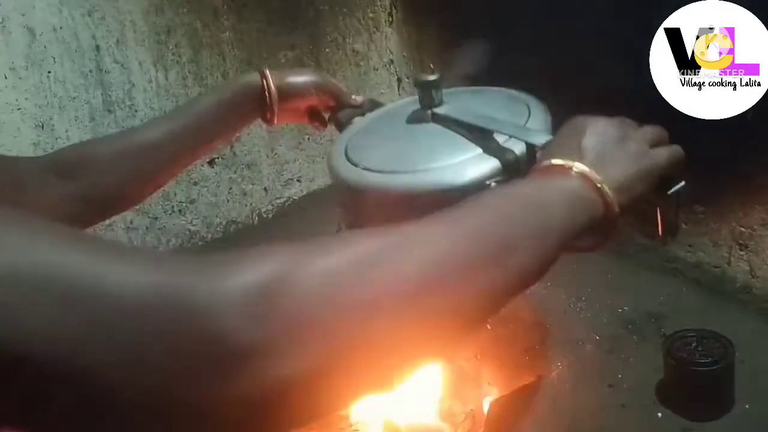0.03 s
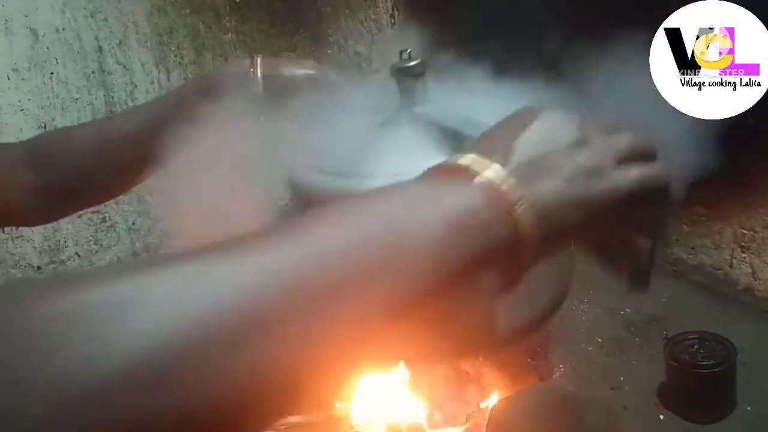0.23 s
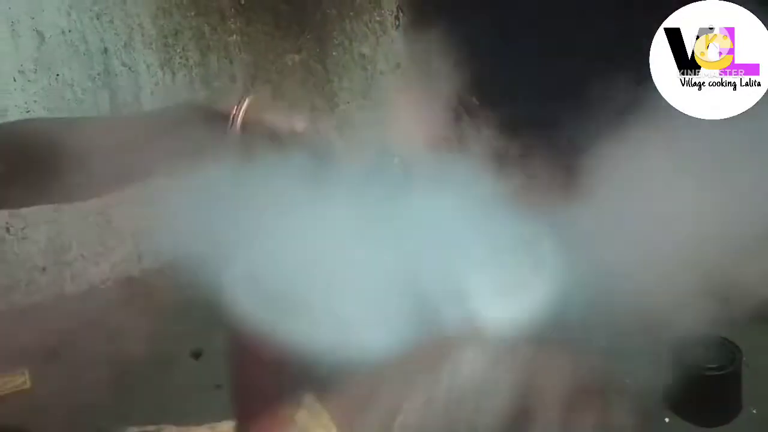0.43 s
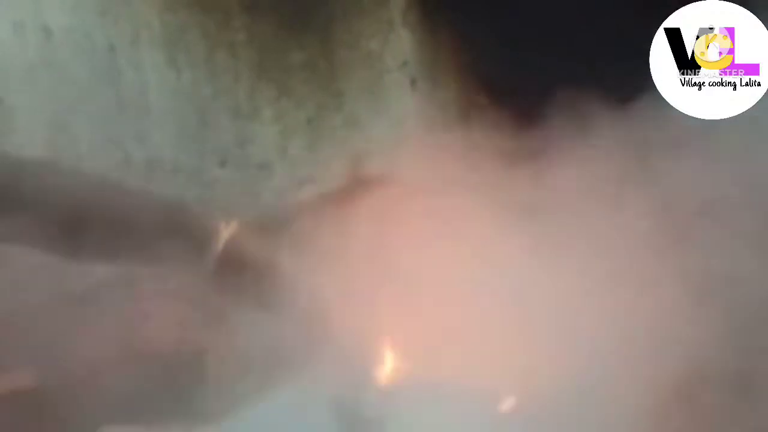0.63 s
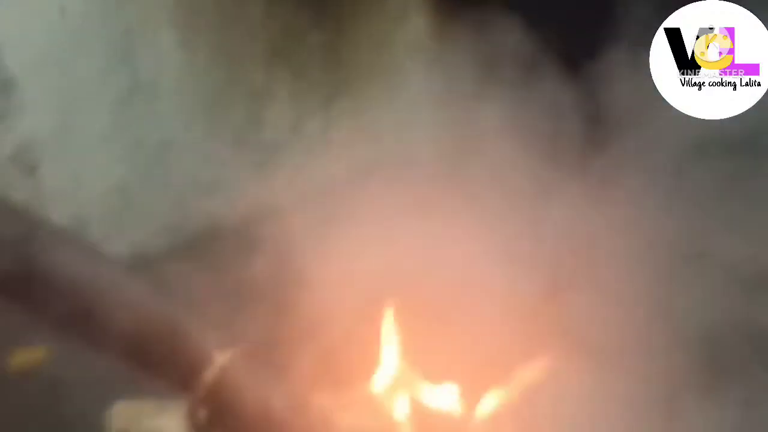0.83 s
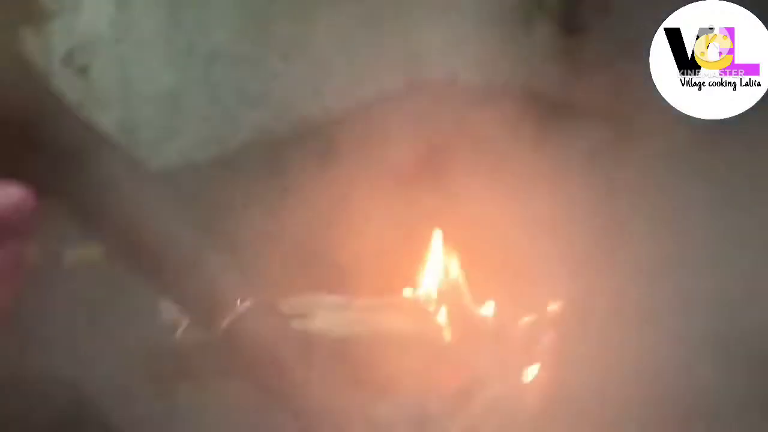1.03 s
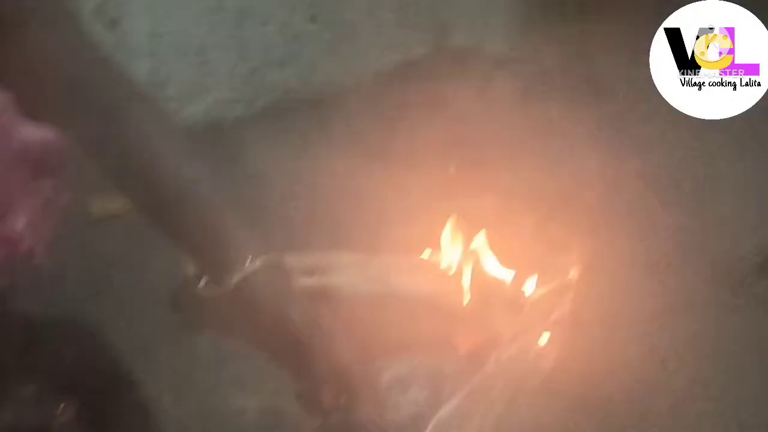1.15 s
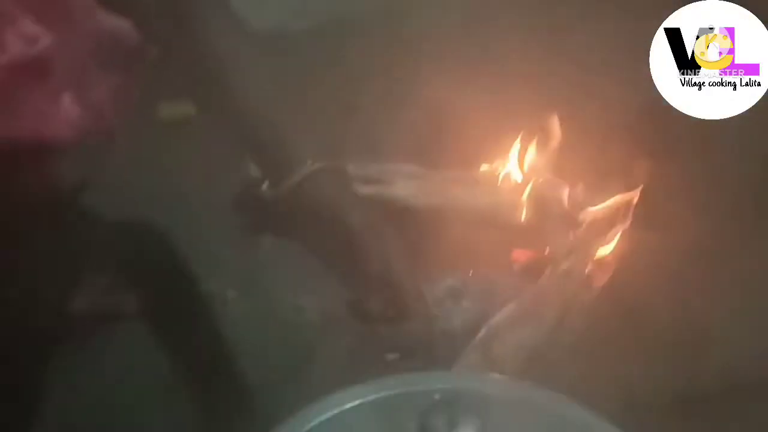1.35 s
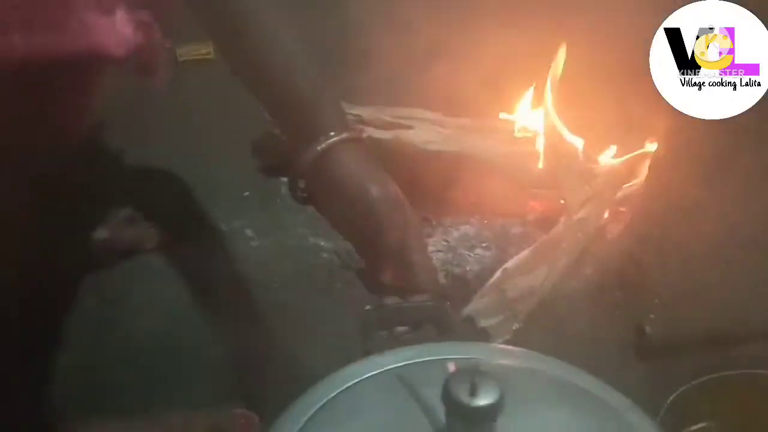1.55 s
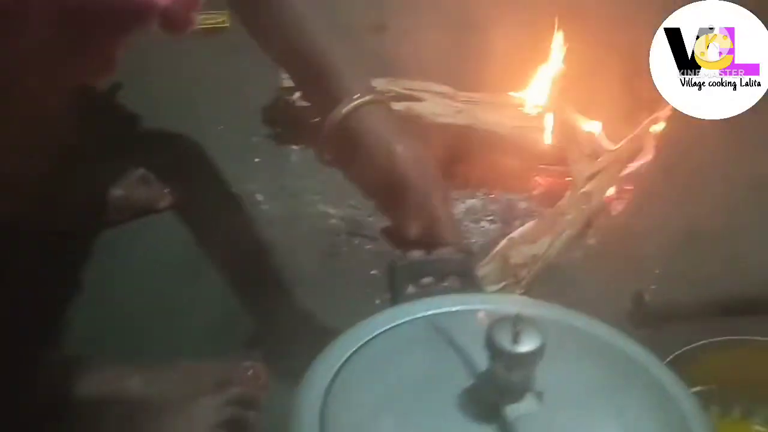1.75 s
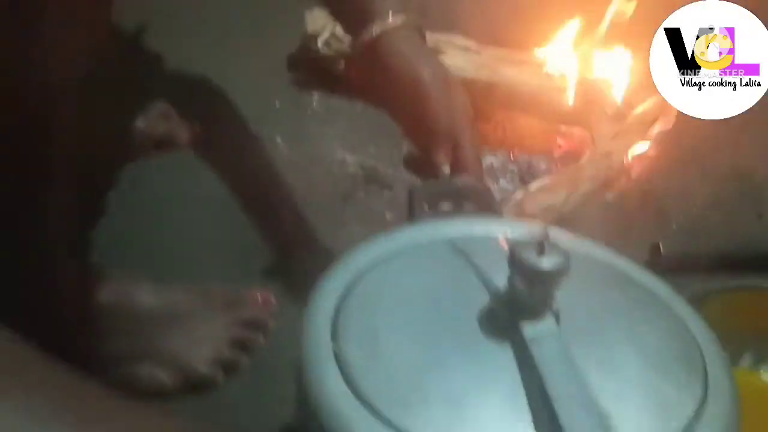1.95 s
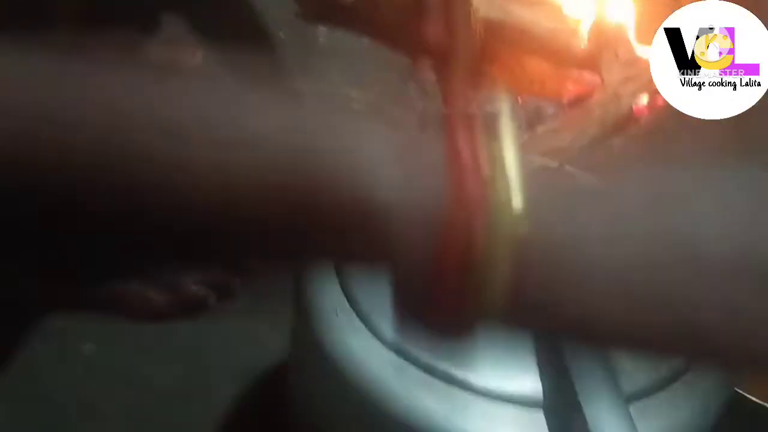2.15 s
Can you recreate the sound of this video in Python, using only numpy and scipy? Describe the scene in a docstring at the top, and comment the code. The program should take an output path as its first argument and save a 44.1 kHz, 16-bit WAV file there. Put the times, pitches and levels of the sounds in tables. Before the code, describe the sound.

A pressure cooker blasts steam, then is set down with faint knocks and scrapes.

```python
"""An earth floor by a wood fire at night, one microphone feeding both channels. Close up, a pressure
cooker is lifted off the fire and blows a loud, turbulent jet of steam with a fuzzy half-whistle from
its vent; gusts of it pop on the microphone. The pot is set down, knocks, scrapes over the gritty earth
and rings faintly. Behind it, insects hiss in a high band."""
import sys
import numpy as np
from scipy import signal
from scipy.fft import rfft, irfft, next_fast_len
from scipy.io import wavfile
from scipy.ndimage import uniform_filter1d, map_coordinates

SR = 44100
rng = np.random.default_rng(int(sys.argv[2]) if len(sys.argv) > 2 else 0)


def unload_wav(signal):
    """Save mono or channel-first audio to the path in sys.argv[1] as 16-bit WAV at rate SR, clipped to [-1, 1]."""
    wavfile.write(
        sys.argv[1],
        SR,
        np.round(np.clip(np.atleast_2d(signal).T, -1, 1) * 32767).astype(np.int16),
    )


N = 97020  # 2.2 s

# The blast of steam, close up: time_s, jet_db, rumble_over_jet_db, mid_hiss_over_jet_db
BLAST = [(.06, -75, -27, -9), (.095, -71, -20, -12), (.16, -50, -31, -9.5), (.2, -31, -31.5, -12),
         (.24, -28, -26, -7.5), (.26, -23, -28, -12.5), (.315, -18, -22.5, -15.5), (.45, -18, -24, -13.5),
         (.6, -17.5, -24.5, -13.5), (.76, -18.5, -22, -12), (.845, -21.5, -25.5, -12.5),
         (.89, -36.5, -27.5, -11.5), (.93, -44, -22, -7.5), (.957, -54, -21, -3), (.975, -77, -22, -8),
         (.99, -100, -10.5, -5)]
# Lift or dip of the jet's top treble: time_s, gain_db
JET_TOP = [(.06, -5), (.2, 1), (.27, -1.5), (.34, -1.5), (.6, -1.5), (.8, 2), (.87, 3.5), (.93, -6.5),
           (.99, -7)]
# The vent's half-whistle: time_s, pitch_hz, level_over_mid_hiss_db
VENT_WHISTLE = [(0, 3566, -16), (.27, 3539, -18), (.33, 3550, -0.5), (.42, 3620, -15), (.55, 3775, -2.5),
                (.7, 3783, -6.5), (.8, 3980, -19.5), (1, 3950, -23.5)]
# Tone of the bright jet, its mid hiss and its rumble: frequency_hz, relative_db
JET_SPECTRUM = [(2940, -41.5), (5000, -10), (5810, -6.5), (6600, -1.5), (7200, 1), (10500, -13.5),
                (13300, -3), (14800, -1), (15600, -5.5), (16000, -16)]
MID_SPECTRUM = [(760, -35), (1300, -12.5), (2030, -10.5), (2390, -9.5), (2500, -7), (3450, -2.5), (3860, 0),
                (5000, -6.5), (6500, -27), (11000, -120)]
RUMBLE_SPECTRUM = [(18, -40.5), (30, -13.5), (59, -11), (187, -2.5), (335, -3), (497, -4.5), (610, -4),
                   (1300, -13), (1690, -32), (2860, -120)]


def steam_jet(whistle_width_hz=300, top_from_hz=10500):
    """Turbulent steam leaves the vent: rumble, hiss and a fuzzy whistle all flutter together."""
    jet_db, rumble_db, mid_db = curves(BLAST)
    top_db, = curves(JET_TOP)
    vent_hz, vent_db = curves(VENT_WHISTLE)
    flutter = amp(jet_db + 0.33 * wobble(21) + 0.31 * wobble(300))
    rumble = amp(rumble_db + 1.8 * wobble(60)) * rush(RUMBLE_SPECTRUM, patchy_db=0)
    vent_tone = np.sin(2 * np.pi * np.cumsum(vent_hz) / SR)
    whistle = unit(wobble(whistle_width_hz) * vent_tone)  # the tone smears into a narrow band
    mid_hiss = amp(mid_db) * (rush(MID_SPECTRUM, patchy_db=1.5) + amp(vent_db) * whistle)
    jet = rush(JET_SPECTRUM, patchy_db=1)
    top = filtered(jet, lambda hz: 1 / (1 + (top_from_hz / (hz + 1)) ** 20))
    return flutter * (jet + (amp(top_db) - 1) * top + mid_hiss + rumble)


# Gusts of steam right on the microphone: start_s, peak_db, direction (+1 push, -1 pull)
GUSTS = [(0.4437, -17, 1), (0.557, -11.5, 1), (0.5656, -16.5, -1), (0.587, -11.5, 1), (0.5949, -10, -1),
         (.698, -31.5, 1)]


def microphone_pops(rise_s=0.00019, fall_s=0.0014):
    """Each gust is one short pressure pulse that swings back through a bass cut."""
    t = np.arange(SR // 20) / SR
    push = (1 - np.exp(-t / rise_s)) ** 2 * np.exp(-t / fall_s)
    pulse = bass_cut(push, corner_hz=71)
    out = np.zeros(N)
    for start_s, peak_db, direction in GUSTS:
        out[round(start_s * SR):][:len(t)] += np.sign(direction) * amp(peak_db) * pulse / pulse.max()
    return out


# Ringing modes of the pot: pitch_hz, relative_db, t60_s
POT_MODES = [(292.2, 3.5, .5), (523, -3.5, 0.19), (519, -29.5, 4.7), (629, 5, 0.13), (1010, -2, 0.19),
             (1050, -9, 0.47), (1180, -0.5, 0.27), (1610, 4, 0.15), (1700, 1, 0.11), (2930, -10, 0.61),
             (3270, -9.5, 0.51), (3608, -23, 0.5), (3930, -12.5, 0.51), (7000, -8, .4)]
# The pot meets the floor: start_s, level_db, centre_hz, width_octaves, rattle_t60_s, ring_gain_db
POT_KNOCKS = [(0.906, -43.5, 1100, 0.71, 0.12, -40), (1.04, -43.5, 652, 0.34, 0.14, -0.5),
              (1.045, -44, 3200, .5, 0.26, 2), (1.078, -45, 960, 0.33, 0.062, -12),
              (1.114, -46.5, 586, 0.44, 0.02, 0), (1.165, -36, 1330, 0.51, 0.02, -12),
              (1.178, -52, 3300, 0.442, 0.058, 11), (1.208, -45.5, 1720, 0.7, 0.071, -9),
              (1.246, -45, 8900, 0.65, .04, -18), (1.304, -51.5, 196, 1.25, 0.3, -10),
              (1.327, -49, 424, 0.65, 0.12, -9.5), (1.408, -43.5, 860, 1.122, 0.069, -3.5),
              (1.41, -50, 2800, .5, 0.21, -4), (1.424, -65.5, 298, 0.1, 0.5, 12.5),
              (1.448, -44, 730, 0.91, 0.11, -4.5), (1.697, -65.5, 996, 1, 0.069, -20),
              (1.727, -58, 1700, 1.03, 0.095, -12), (1.731, -59, 188.4, 0.21, 0.066, -27),
              (1.81, -71.5, 1800, 0.26, 0.27, -20.5), (1.814, -68.5, 189, 0.51, 0.18, -37),
              (1.858, -63.5, 1910, .5, .08, -22), (1.859, -61.5, 214, 0.24, 0.12, -34),
              (1.933, -64, 2000, 0.68, 0.037, -22.5), (2.039, -59.5, 1185, 1.1, 0.16, -7.5),
              (2.089, -65, 105, 0.19, 0.22, -30), (2.132, -62.5, 1073, 0.65, .08, -16.5)]


def pot_knocks(rise_cycles=0.46, ring_build=8.8, waver_db=2.5):
    """Each knock is a short rattle that thuds and rings the pot's modes, most near its own centre."""
    out = np.zeros(N + SR)
    t = np.arange(SR * 4 // 5) / SR
    for start_s, level_db, centre_hz, width_octaves, rattle_t60_s, ring_gain_db in POT_KNOCKS:
        blow_band = lambda hz: amp(-6 * (np.log2((hz + 1) / centre_hz) / width_octaves) ** 2)
        ring = np.zeros(len(t))
        for pitch_hz, mode_db, t60_s in POT_MODES:
            if blow_band(pitch_hz) > .03:  # only modes within the blow's band sound
                decay = amp(mode_db - 60 * t / t60_s + waver_db * wobble(29.5, len(t)))
                ring += blow_band(pitch_hz) * decay * np.sin(2 * np.pi * (pitch_hz * t + rng.random()))
        rattle_db = -60 * t / rattle_t60_s
        ring *= 1 - amp(ring_build * rattle_db)  # builds faster than the rattle dies
        attack = 1 - np.exp(-t * centre_hz / rise_cycles)
        thud = attack * amp(rattle_db) * unit(filtered(rng.standard_normal(len(t)), blow_band))
        out[round(start_s * SR):][:len(t)] += amp(level_db) * (amp(ring_gain_db) * ring + thud)
    return out[:N]


# The pot's slide along the floor: time_s, grit_db, drag_db
SLIDE = [(1.039, -96, -95), (1.042, -48, -62), (1.06, -49.5, -57.5), (1.11, -48.5, -48), (1.14, -56.5, -59),
         (1.163, -60, -61), (1.166, -48.5, -46), (1.178, -38.5, -43.5), (1.21, -46, -51.5),
         (1.24, -50.5, -52), (1.256, -44.5, -56), (1.285, -59, -73), (1.3, -76, -65), (1.308, -69, -74),
         (1.33, -55.5, -63), (1.4, -75, -68), (1.43, -65, -52.5), (1.47, -62.5, -58), (1.55, -80, -72),
         (1.6, -93, -79)]
# Tone of the gritty treble and of the low drag: frequency_hz, relative_db
GRIT_SPECTRUM = [(1180, -26), (2000, -17.5), (2600, -4.5), (3010, -1), (3400, -2.5), (5210, -5.5),
                 (7250, 0.5), (9580, -14), (14800, -16), (16000, -16.5)]
DRAG_SPECTRUM = [(35, -45), (70, -24), (130, -6.5), (190, -2), (280, -7), (700, -9), (1000, -14),
                 (2000, -14.5), (2600, -54)]


def pot_scrape(grains_per_s=730, grain_spread_db=3):
    """The base drags over gritty earth: tiny grain clicks in bright noise, above an uneven low rub."""
    grit_db, drag_db = curves(SLIDE)
    grain_hits = rng.random(N) < grains_per_s / SR
    grains = grain_hits * amp(grain_spread_db * rng.exponential(size=N)) * rng.standard_normal(N)
    drag = amp(drag_db + wobble(49.35)) * rush(DRAG_SPECTRUM, patchy_db=4)
    grit = amp(grit_db + 1.5 * wobble(70)) * rush(GRIT_SPECTRUM, patchy_db=1, source=grains)
    return grit + drag


# The night behind the pot: time_s, ambience_db, swell_db
NIGHT_LEVELS = [(0, -77.5, -89.5), (.9, -75.5, -87), (1.03, -71, -93), (1.1, -58.5, -92), (1.38, -60, -75),
                (1.47, -58, -68), (1.55, -64, -75), (1.85, -63.5, -82), (1.98, -62.5, -65.5),
                (2.08, -64.5, -83), (2.2, -64.5, -88)]
# Tone of the ambience with its insect band, and of the treble swell: frequency_hz, relative_db
NIGHT_SPECTRUM = [(25, -33.5), (70, -9), (130, -9.5), (300, -12), (660, -16), (1760, -18.5), (4680, -17),
                  (5720, -16.5), (7170, 2), (8990, -18.5), (14500, -25), (16000, -29)]
SWELL_SPECTRUM = [(9000, -59), (11500, -5.5), (13500, 2), (16000, -6.5)]


def night_insects():
    """Insects hiss near 7 kHz over quiet ambience; the top treble swells faintly."""
    ambience_db, swell_db = curves(NIGHT_LEVELS)
    ambience = amp(ambience_db + .8 * wobble(12)) * rush(NIGHT_SPECTRUM, patchy_db=1)
    return ambience + amp(swell_db) * rush(SWELL_SPECTRUM, patchy_db=-2)


def amp(db):
    """Decibels to gain."""
    return 10 ** (np.asarray(db) / 20)


def unit(x):
    """Scale to rms 1."""
    return x / np.sqrt(np.mean(x ** 2) + 1e-20)


def curves(rows):
    """One value per sample for each column after time_s; -120 outside the table."""
    time_s, *columns = np.transpose(rows)
    return [np.interp(np.arange(N) / SR, time_s, column, left=-120, right=-120) for column in columns]


def wobble(knots_per_s, n=N):
    """A smooth random curve of n samples."""
    knots = rng.standard_normal(int(n * knots_per_s / SR) + 4)
    return map_coordinates(knots, [np.arange(n) * knots_per_s / SR], order=2)


def filtered(x, response):
    """Filter x by a gain given as a function of frequency."""
    size = next_fast_len(len(x) + 8192)
    return irfft(rfft(x, size) * response(np.fft.rfftfreq(size, 1 / SR)), size)[:len(x)]


def bass_cut(x, corner_hz):
    """Third-order high-pass."""
    return signal.sosfilt(signal.butter(3, corner_hz, "high", fs=SR, output="sos"), x)


def rush(spectrum, patchy_db, source=0):
    """Noise plus any source, with random patches of gain in time and frequency, coloured, at rms 1."""
    cells = signal.stft(rng.standard_normal(N) + source, nperseg=256)[2]
    patches = uniform_filter1d(rng.standard_normal(cells.shape), size=5, axis=0)
    patches = uniform_filter1d(patches, size=6, axis=1)
    noise = signal.istft(cells * amp(patchy_db * unit(patches)), nperseg=256)[1][:N]
    points_hz, db = np.transpose(spectrum)
    colour = lambda hz: amp(np.interp(np.log(hz + 1), np.log(points_hz + 1), db, left=-120, right=-120))
    return unit(filtered(noise, colour))


def scene():
    """Steam, pot and insects at one microphone, the same on both channels."""
    setting_down = bass_cut(pot_knocks() + pot_scrape(), corner_hz=72)
    mono = steam_jet() + microphone_pops() + setting_down + night_insects()
    return np.array([mono, mono])


def record(dry, top_hz=15780, edge_hz=250):
    """The treble ends in a steep edge; nothing passes above it."""
    band_limit = lambda hz: np.clip((top_hz - hz) / edge_hz, 0, 1) ** .7
    return np.array([filtered(channel, band_limit) for channel in dry])


dry = scene()
out = record(dry)
unload_wav(out)
```